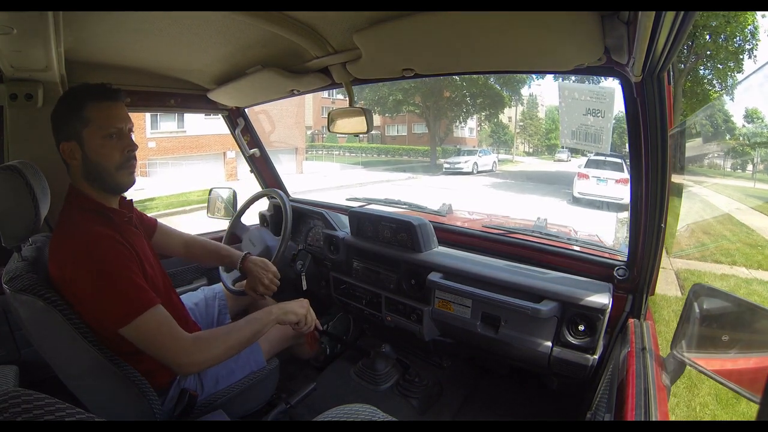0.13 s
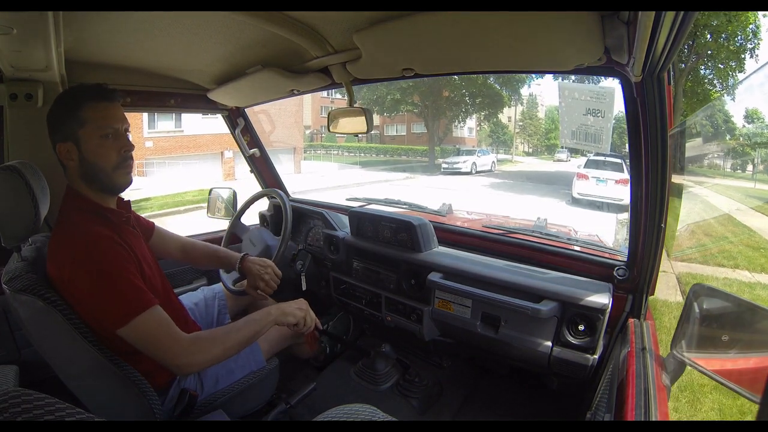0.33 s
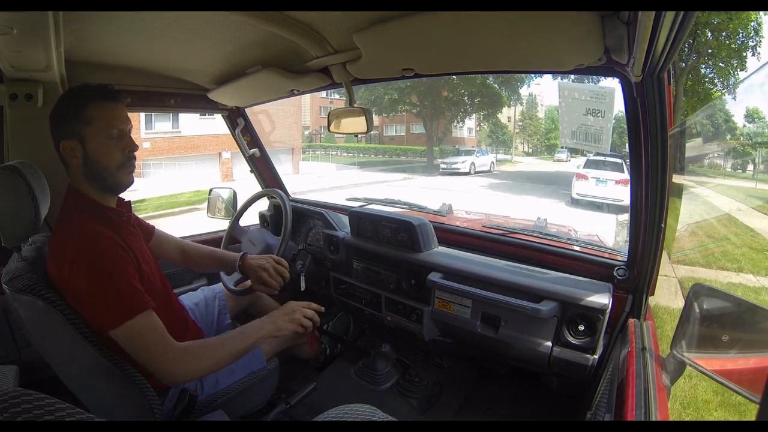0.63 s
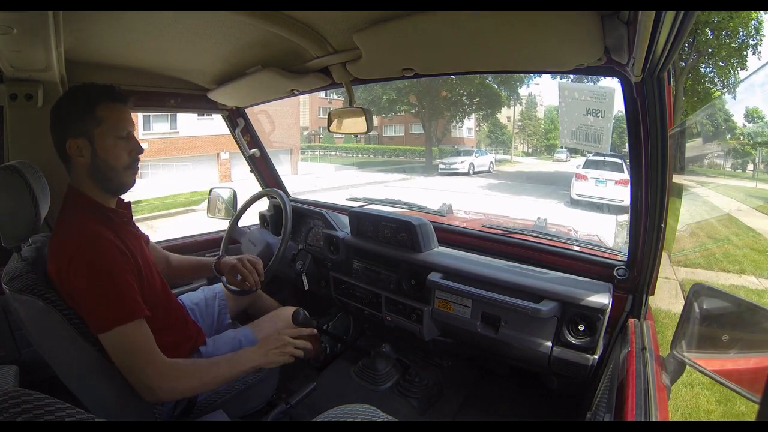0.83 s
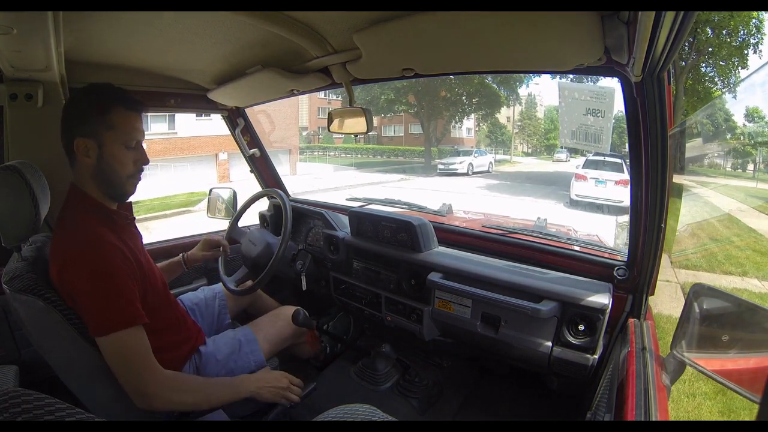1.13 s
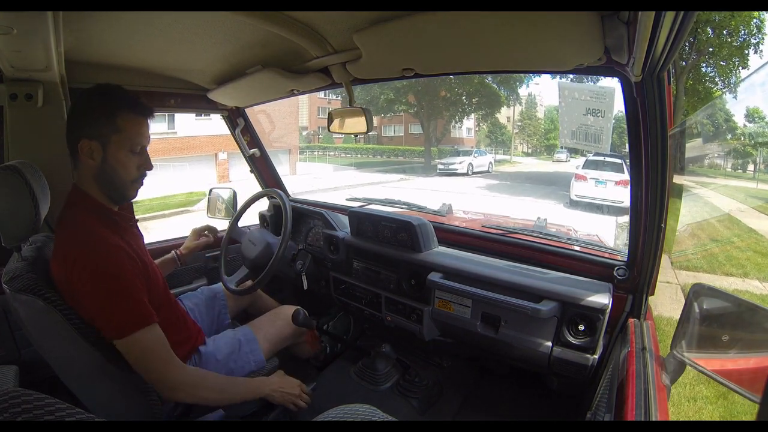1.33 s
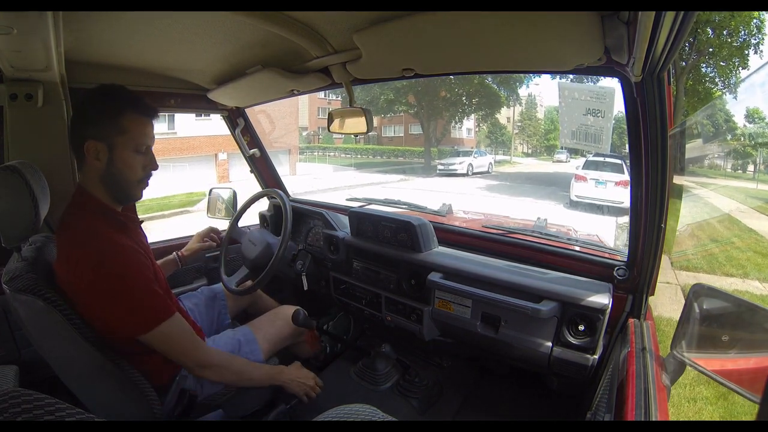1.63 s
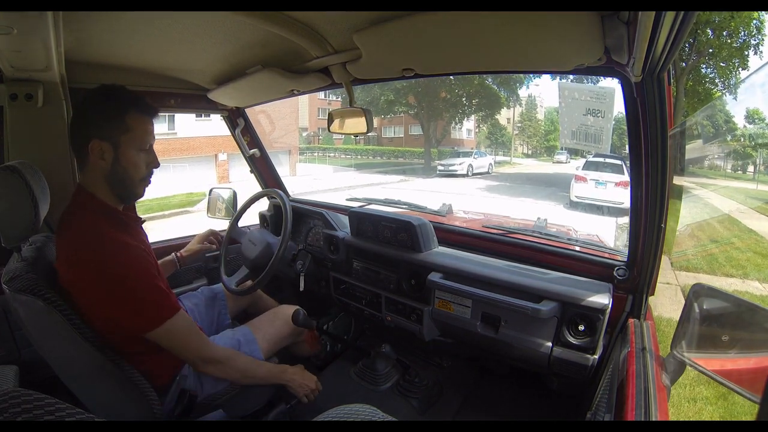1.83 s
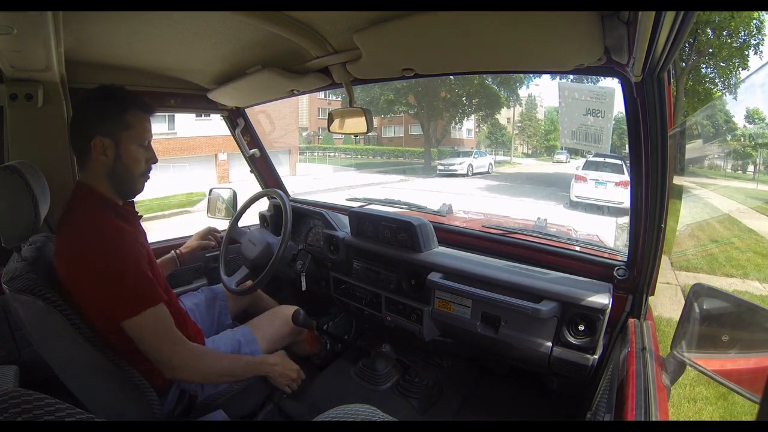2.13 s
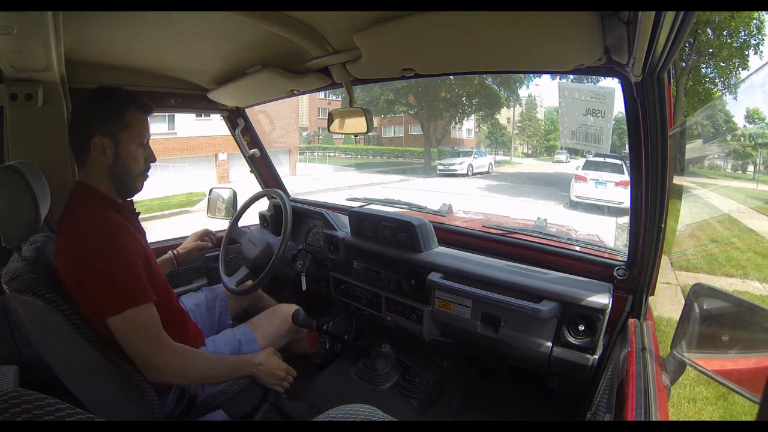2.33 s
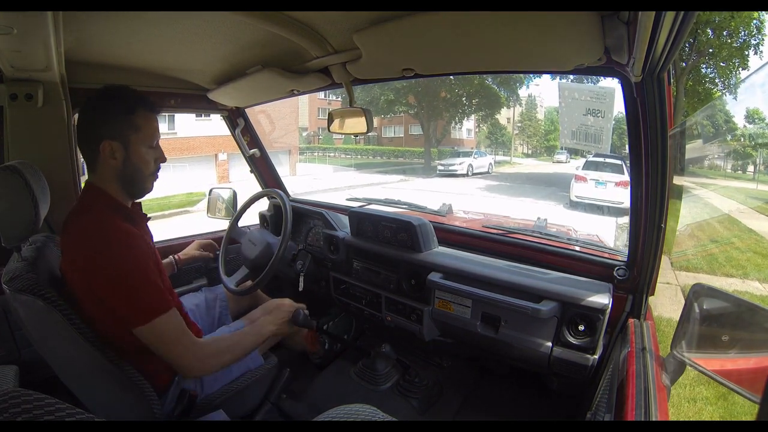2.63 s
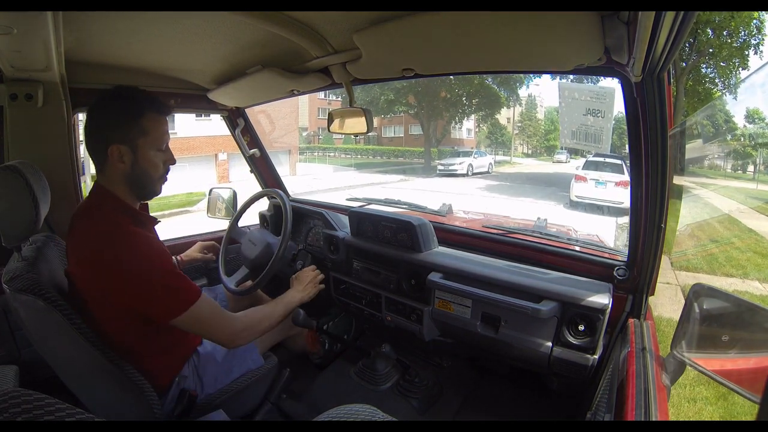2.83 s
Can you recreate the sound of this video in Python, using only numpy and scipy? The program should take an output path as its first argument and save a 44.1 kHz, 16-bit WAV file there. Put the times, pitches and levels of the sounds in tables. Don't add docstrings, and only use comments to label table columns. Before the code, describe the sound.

Inside a parked vehicle, a low engine idle drones and buzzes; after about two seconds a handbrake ratchets in a short rapid clicking burst and settles with a soft thud, captured close in a dry cabin.

```python
import sys
import numpy as np
from scipy import signal
from scipy.fft import rfft, irfft, next_fast_len
from scipy.io import wavfile
from scipy.ndimage import uniform_filter1d, map_coordinates

SR = 44100
rng = np.random.default_rng(int(sys.argv[2]) if len(sys.argv) > 2 else 0)


def boost_factor(decibels):
    exponent = np.asarray(decibels, float) / 20
    return 10 ** exponent


def wrap_up_sound(samples):
    columns = np.atleast_2d(samples).T
    tamed = np.clip(columns, -1, 1)
    steps = np.round(tamed * 32767).astype(np.int16)
    wavfile.write(sys.argv[1], SR, steps)


N = 130977
TIME = np.arange(N) / SR


def unit(x):
    return x / np.sqrt(np.mean(x ** 2) + 1e-20)


def noise():
    return rng.standard_normal(N)


def curves(rows):
    s, *columns = np.transpose(rows)
    return [np.interp(TIME, s, column) for column in columns]


def wobble(rate):
    points = rng.standard_normal(int(N * rate / SR) + 4)
    return map_coordinates(points, [np.arange(N) * rate / SR])


def filtered(x, response):
    size = next_fast_len(len(x) + SR // 4)
    spectrum = rfft(x, size) * response(np.fft.rfftfreq(size, 1 / SR))
    return irfft(spectrum, size)[:len(x)]


def low_pass(x, corner_hz, steepness=6):
    return filtered(x, lambda f: 1 / (1 + (f / corner_hz) ** steepness))


def coloured(points):
    hz, db = np.transpose([(1, -120), *points, (SR / 2, -120)])
    return unit(filtered(noise(), lambda f: boost_factor(np.interp(np.log(f + 1), np.log(hz), db))))


def resonant(x, peaks):
    def response(f):
        total = 0
        for k, (centre, width, db) in enumerate(peaks):
            peak = 1j * f * width / (centre * centre - f * f + 1j * f * width)
            total = total + (-1) ** k * boost_factor(db) * peak
        return total
    return unit(filtered(x, response))


# f/Hz, level/dB (per Hz)
HISS_COLOUR = [(1500, -3), (2500, -1.5), (5000, -9.5), (9000, -15), (12500, -23.5), (13000, -40),
               (15500, -45.5)]


def hiss():
    return boost_factor(-69.5) * coloured(HISS_COLOUR)


def cabin(x):
    t = np.arange(SR // 5) / SR
    t60_s, rise_s = 0.1, 0.003
    tail = rng.standard_normal(len(t)) * boost_factor(-60 * t / t60_s) * np.minimum(t / rise_s, 1)
    return boost_factor(-17) * signal.fftconvolve(x, tail / np.linalg.norm(tail))[:N]


# f/Hz, level/dB
WHINE_TONES = [(7978, -100), (9087, -93)]


def whine():
    return np.sqrt(2) * sum(boost_factor(db) * np.sin(2 * np.pi * hz * TIME) for hz, db in WHINE_TONES)


# f/Hz, level/dB (per Hz)
BODY_COLOUR = [(70, -7), (110, -3), (300, -7.5), (420, -16.5), (700, -21), (1100, -27.5), (1900, -28),
               (2500, -71)]


def body_noise():
    return boost_factor(-52.5 + 0.79 * wobble(12)) * coloured(BODY_COLOUR)


# f/Hz, level/dB (per Hz)
SHAKE_COLOUR = [(8, -28.5), (18, -0.5), (30, -1.5), (55, 0.5), (78, -18.5), (92, -36)]


def body_shake(shake_db):
    return boost_factor(shake_db) * coloured(SHAKE_COLOUR)


# t/s, rate/(engine cycles per s)
IDLE_SPEED = [(0, 8.566), (2.08, 8.566), (2.16, 8.523), (2.4, 8.523), (2.97, 8.532)]


def crank_angle():
    start_angle = -0.71
    return start_angle + 2 * np.pi * np.cumsum(curves(IDLE_SPEED)[0]) / SR


CYLINDER_PUSH = [6.5, -1, 7, 3.5]


def firing_pushes(angle):
    stroke = np.floor(angle * 2 / np.pi).astype(int)
    strength = boost_factor(np.take(CYLINDER_PUSH, stroke, mode="wrap"))
    return np.diff(stroke, prepend=stroke[0]) * strength


# f/Hz, width/Hz, level/dB
CLATTER_PEAKS = [(1346, 100, 0.5), (1267, 160, -2.5), (1415, 260, -7), (1825, 71, -11), (2165, 120, -14.5),
                 (3290, 240, -18), (4830, 710, -28)]


def valve_clatter(angle, fired):
    depth, lead_angle, tick_share = 0.41, 0.25, 0.33
    gate = 1 + depth * np.cos(4 * (angle + lead_angle))
    source = unit(gate * noise()) + tick_share * unit(fired)
    clatter = filtered(resonant(source, CLATTER_PEAKS), lambda f: 1 / (1 + (1150 / (f + 1)) ** 6))
    return boost_factor(-62 + 0.37 * wobble(10.0)) * clatter


# f/Hz, width/Hz, level/dB
FIRM_PANELS = [(134.3, 17, -8.5), (257, 36, -8.5), (389, 13, -7.5)]
# f/Hz, width/Hz, level/dB
LOOSE_PANEL_PEAKS = [(310.1, 7.3, -6.5), (324.9, 12, 1), (341.8, 19, -6.5)]
# t/s, buzz level/dB
LOOSE_PANEL_BUZZ = [(0.1, -52), (0.2, -54.5), (0.54, -54), (0.56, -47), (0.89, -56), (0.92, -49),
                    (1.67, -51.5), (1.71, -61.5), (1.74, -48.5), (1.93, -56), (1.96, -49.5), (2.06, -58),
                    (2.09, -54), (2.35, -52), (2.38, -50), (2.42, -46), (2.85, -52.5), (2.9, -52.5)]


def panels(fired):
    kicks = unit(fired * boost_factor(1.7 * noise()))
    pushes = kicks + 0.65 * noise()
    firm = boost_factor(-60) * resonant(pushes, FIRM_PANELS)
    loose = boost_factor(1 + curves(LOOSE_PANEL_BUZZ)[0]) * resonant(pushes, LOOSE_PANEL_PEAKS)
    return low_pass(firm + loose, 430)


# multiple of the cycle rate, level/dB, cycle angle/rad
WEAK_ORDERS = [(5, -52.5, 0.2), (6, -47, .4), (7, -48, 0.23), (9, -43.5, -.3), (11, -64, 0.27),
               (12, -63, 0.19), (16, -62.5, .06), (28, -72, .1), (38, -64, 0.0225), (40, -67.5, 0.0634),
               (45, -67.5, .03), (157, -74.5, 0), (199.4, -85, -0.13)]


def weak_tones(angle, octave_db):
    tones = sum(boost_factor(db) * np.cos(round(k) * (angle + lead)) for k, db, lead in WEAK_ORDERS)
    return np.sqrt(2) * boost_factor(octave_db - octave_db.mean()) * tones


# t/s, firing tone level/dB, octave level/dB, body shake level/dB
BOOM_LEVELS = [(0.1, -23.5, -20.5, -34.5), (0.54, -22.5, -21.5, -35), (0.58, -24.5, -21, -38.5),
               (1.72, -23, -22, -33.5), (1.79, -29, -21, -38), (1.88, -20, -22.5, -43),
               (1.93, -25, -24.5, -32.5), (2.54, -28.5, -24, -35.5), (2.64, -25, -22.5, -34.5),
               (2.73, -32.5, -24, -42), (2.81, -24, -24, -41), (2.9, -27.5, -22.5, -33.5)]


def engine():
    angle = crank_angle()
    fired = firing_pushes(angle)
    firing_db, octave_db, shake_db = uniform_filter1d(curves(BOOM_LEVELS), size=SR // 20, mode="nearest")
    boom = np.sqrt(2) * (boost_factor(firing_db) * np.cos(4 * angle) - boost_factor(octave_db) * np.cos(8 * angle))
    rumble = body_noise() + body_shake(shake_db)
    return rumble + valve_clatter(angle, fired) + panels(fired) + weak_tones(angle, octave_db) + boom


# t/s, level/dB
PULL_EFFORT = [
    (0, -89.5),
    (2.2, -92),
    (2.23, -54.5),
    (2.35, -49.5),
    (2.45, -58),
    (2.49, -86.5),
    (2.97, -86),
]
# f/Hz, width/Hz, level/dB
BRACKET_PEAKS = [(268, 30, 1.5), (408, 40, -2.5), (652, 22, -1), (740, 73, -1.5), (806, 90, -5),
                 (900, 80, -13)]


def cable():
    creak = low_pass(resonant(noise(), BRACKET_PEAKS), 1100)
    return boost_factor(curves(PULL_EFFORT)[0] + 1.3 * wobble(45)) * creak


# f/Hz, width/Hz, level/dB
SETTLE_PEAKS = [(500, 290, -13), (1448, 120, 3.5), (1620, 140, -0.5), (1900, 160, -10.5),
                (2740, 410, -14.5), (3200, 400, -14), (4490, 78, -14.5), (6440, 1500, -33.5)]


def settle():
    t = np.maximum(TIME - 2.6115, 0)
    knock_t60_s, rise_s = 0.092, 0.0038
    fade = boost_factor(-40.5 - 60 * t / knock_t60_s) * np.minimum(t / rise_s, 1)
    knock = fade * resonant(noise(), SETTLE_PEAKS)
    thud_hz, thud_t60_s, thud_lag_s = 189, 0.055, 0.001
    late = np.maximum(t - thud_lag_s, 0)
    thud = boost_factor(-34.5 - 60 * late / thud_t60_s) * np.sin(2 * np.pi * thud_hz * late)
    return knock - thud


# f/Hz, width/Hz, level/dB
PAWL_PEAKS = [(806, 300, -8.5), (1550, 400, 2.5), (2166, 280, 3), (2680, 300, -8), (3140, 350, -4.5),
              (3930, 250, -11.5), (4420, 150, -9), (5175, 160, -3.5), (5900, 200, -6), (6680, 330, -5.5),
              (7560, 350, -12.5), (7740, 370, -9), (10200, 2000, -20.5), (14000, 900, -25.5)]


def pawl_rattle(same, t):
    rise_s, t60_s, new_share, scatter_db = 0.0028, 0.052, 0.7, 1.5
    peaks = [(hz, width, db + scatter_db * rng.normal()) for hz, width, db in PAWL_PEAKS]
    snap = np.minimum(t / rise_s, 1) ** 0.87 * boost_factor(-60 * t / t60_s)
    return boost_factor(-4) * snap * resonant(same + new_share * rng.standard_normal(len(t)), peaks)


# f/Hz, first tooth level/dB, last tooth level/dB, time to fade by 60 dB t60/s
HOUSING_MODES = [(1282, -13, -6, .1), (1430, 1.5, 0.5, 0.067), (1549, -3.5, -3.5, 0.15),
                 (1639, -12.5, -1, .08), (1730, -4.5, -2, 0.13), (1885, -34, -23, 0.062),
                 (2074, -26, -18, 0.081), (2133, -11, -8, 0.043), (2332, -15.5, -24, 0.065),
                 (2700, -24, -27, 0.04), (3080, -19, -19, 0.084), (3240, -34, -11, 0.044)]


def housing_ring(tension, start, t):
    rise_s, hold_s, drop_s, drop_db = 0.006, 0.0145, 0.0019, 7.5
    loss_while_held, scatter_db, detune = 0.3, 1.3, 0.004
    swell = np.sin(np.pi / 2 * np.minimum(t / rise_s, 1)) ** 2
    swell = swell * boost_factor(-drop_db * np.clip((t - hold_s) / drop_s, 0, 1))
    aged = loss_while_held * np.minimum(t, hold_s) + np.maximum(t - hold_s, 0)
    hz, slack_db, tight_db, t60 = np.transpose(HOUSING_MODES)[..., None]
    level_scatter, pitch_scatter = rng.standard_normal((2, len(hz), 1))
    level_db = slack_db + tension * (tight_db - slack_db) + scatter_db * level_scatter - 60 * aged / t60
    phase = start + 2 * np.pi * hz * (1 + detune * pitch_scatter) * t
    return boost_factor(-3.5) * swell * np.sum(boost_factor(level_db) * np.sin(phase), axis=0)


# t/s, peak level/dB, housing over pawl level/dB
TOOTH_DROPS = [
    (2.2206, -33.5, -2),
    (2.256, -33, -1),
    (2.2918, -34, -1),
    (2.3207, -33.5, -1),
    (2.3427, -33, -2.5),
    (2.362, -33.5, -2.5),
    (2.3835, -35.5, 0),
    (2.4069, -34, -3.5),
    (2.4368, -34.5, -3.5),
]


def lever():
    out = np.zeros(N + SR)
    t = np.arange(SR // 5) / SR
    same = rng.standard_normal(len(t))
    start = rng.uniform(0, 2 * np.pi, (len(HOUSING_MODES), 1))
    tensions = np.linspace(0, 1, len(TOOTH_DROPS))
    for tension, (s, db, housing_db) in zip(tensions, TOOTH_DROPS):
        click = pawl_rattle(same, t) + boost_factor(housing_db) * housing_ring(tension, start, t)
        first = round((s - 0.0015) * SR)
        out[first:first + len(t)] += boost_factor(db) * click
    return low_pass(out[:N], 14600, 60)


def scene():
    brake = cable() + settle() + lever()
    return (hiss() + whine() + engine() + cabin(brake) + brake)[None]


def top_cut(x):
    return signal.sosfilt(signal.butter(12, 15710, fs=SR, output="sos"), x)


def record(dry):
    return top_cut(dry)


dry = scene()
out = record(dry)
wrap_up_sound(out)
```